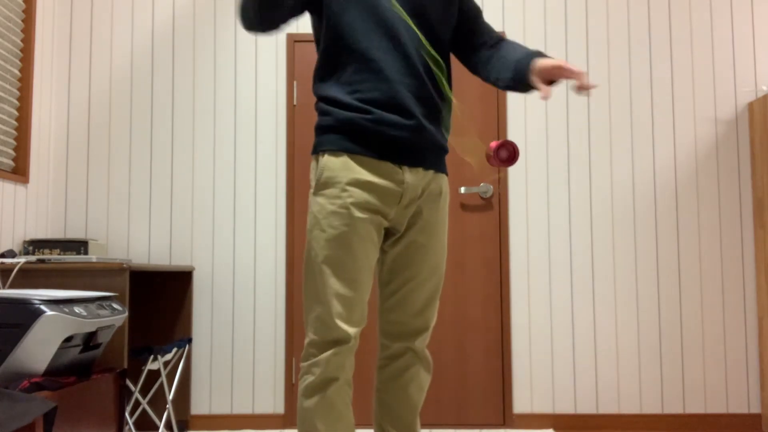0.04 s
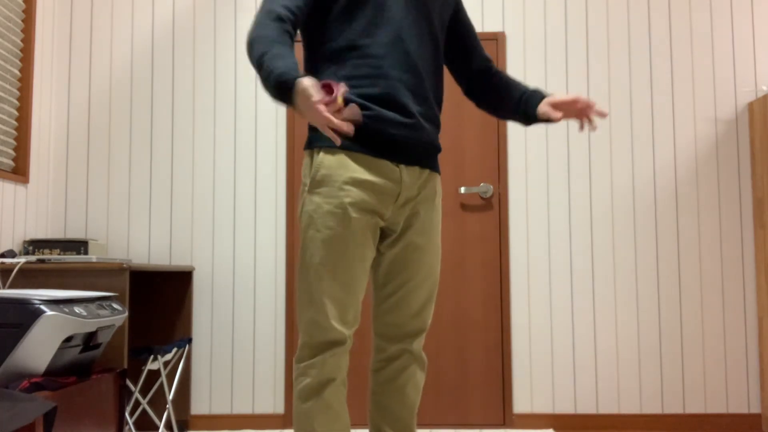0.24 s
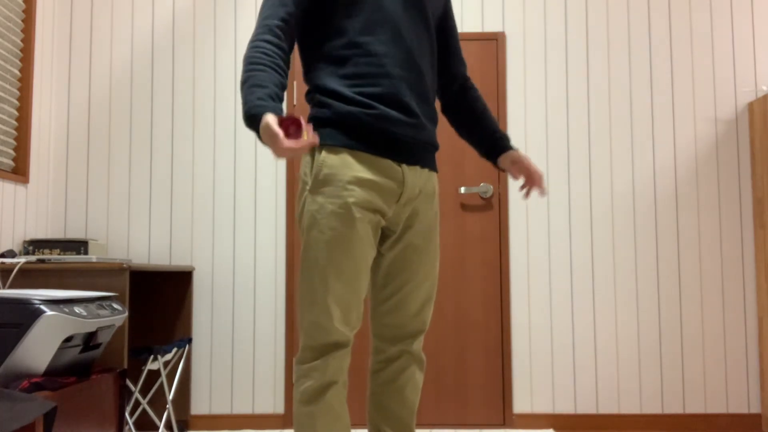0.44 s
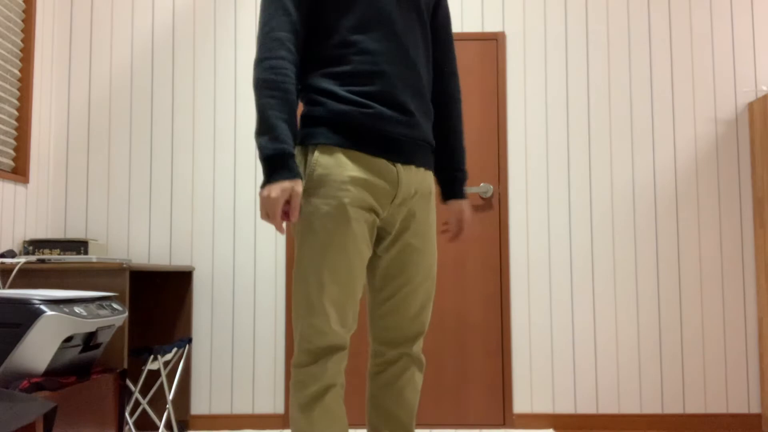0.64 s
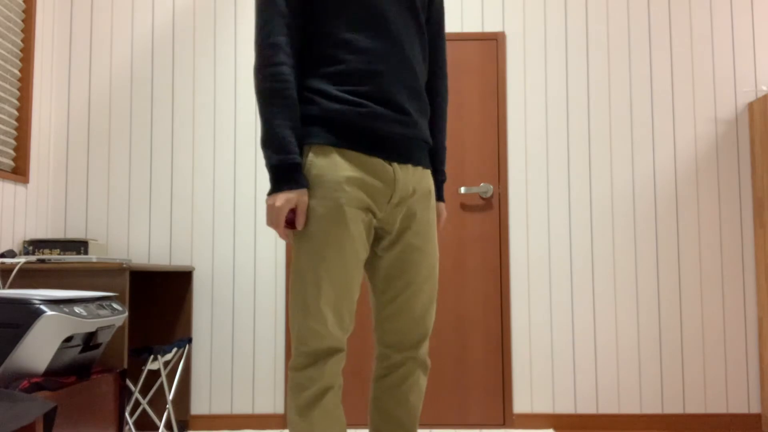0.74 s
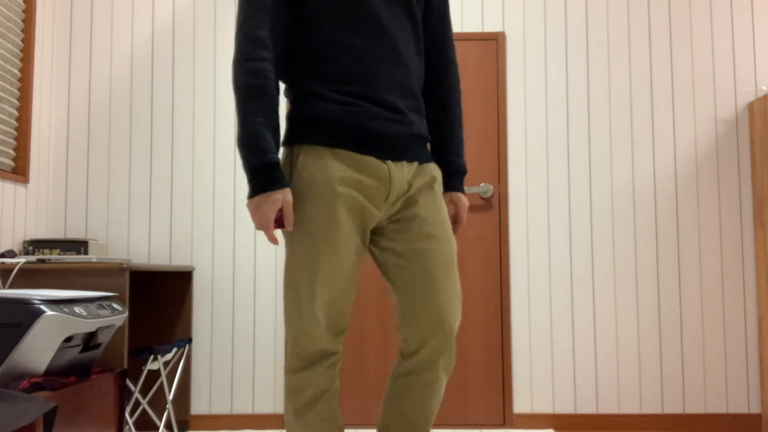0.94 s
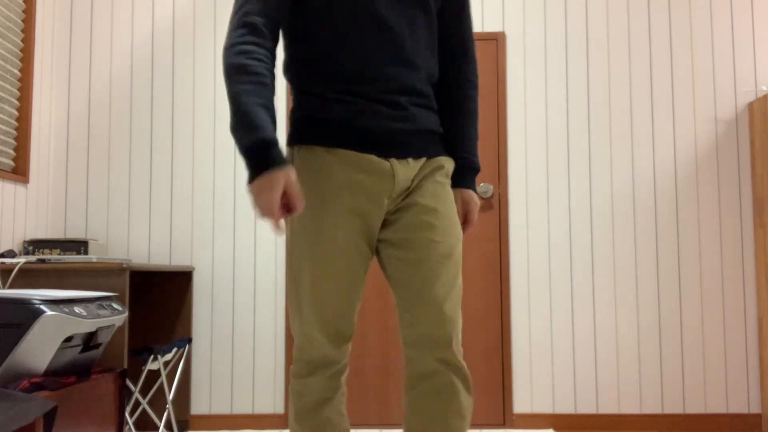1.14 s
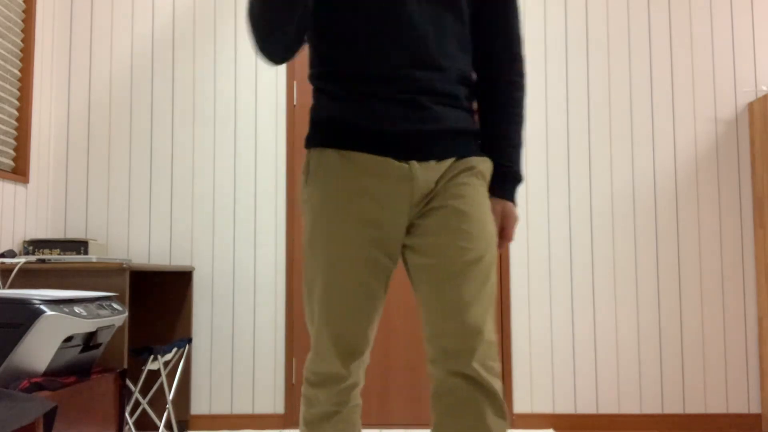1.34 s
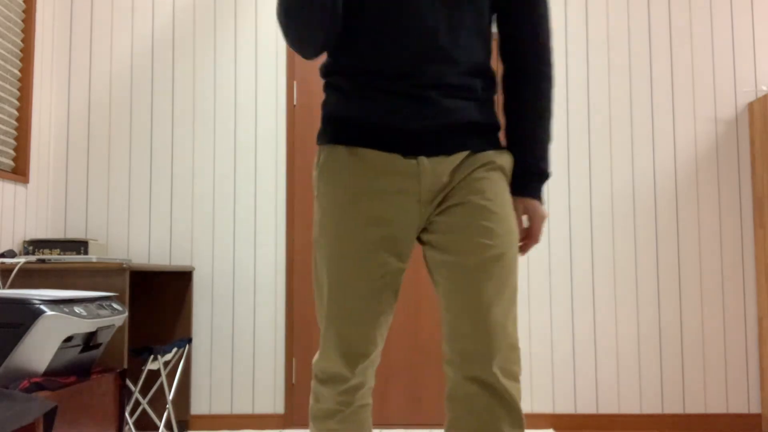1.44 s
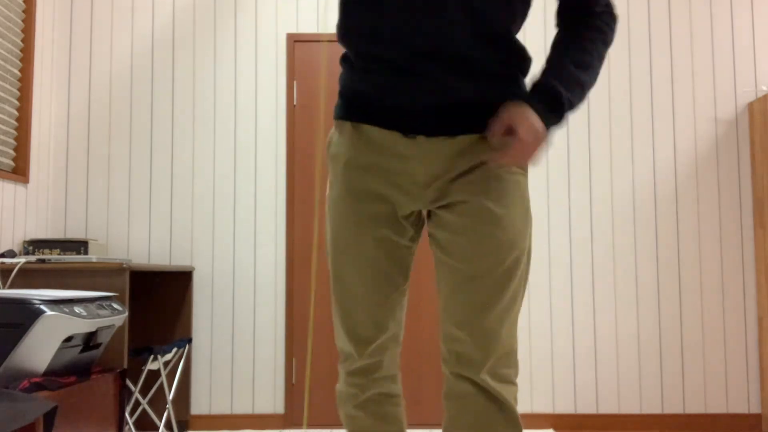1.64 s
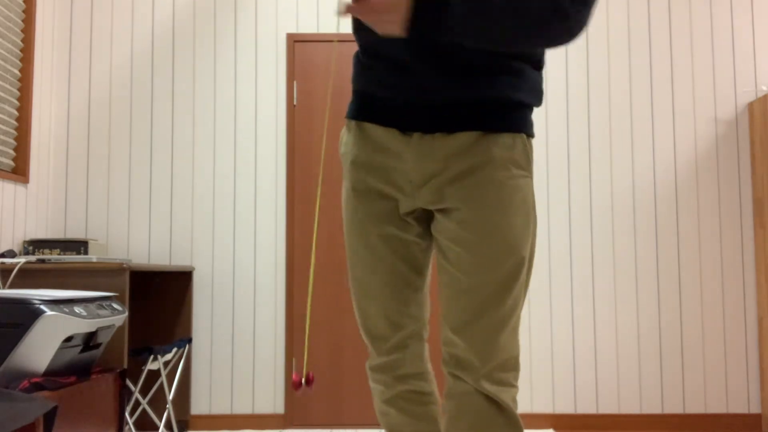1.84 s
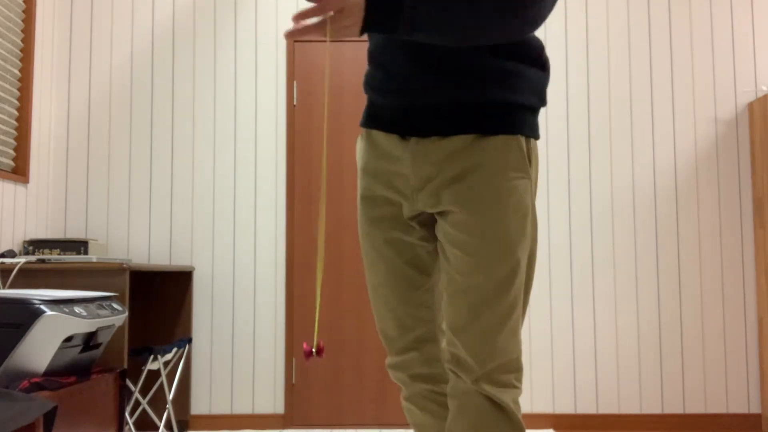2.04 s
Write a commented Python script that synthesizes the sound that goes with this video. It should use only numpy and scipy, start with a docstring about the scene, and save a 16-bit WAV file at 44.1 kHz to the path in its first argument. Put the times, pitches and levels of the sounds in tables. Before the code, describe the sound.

A metal yo-yo squeals thinly up its string and is caught at 0.2 seconds with a loud, briefly ringing knock. Soft pats, scuffs and sleeve swishes follow from about 0.7 seconds. A heel thumps on floorboards at 1.3 seconds. The string zips out around 1.5 and snaps tight just after 1.6, and the yo-yo spins with a faint hissing whir until about 2 seconds, in a small quiet room.

```python
"""In a small quiet room, a metal yo-yo squeals up its string and is caught with a ringing knock.
A hand pats the trousers, a foot shuffles, a sleeve swishes and a heel thumps as it is thrown again.
The string unwinds and snaps tight, and the yo-yo whirs on its bearing. The bearing shakes the
two metal shells, and the spin splits each of their ringing tones in two."""
import sys
import numpy as np
from scipy import signal
from scipy.fft import rfft, irfft
from scipy.io import wavfile

SR = 44100
rng = np.random.default_rng(int(sys.argv[2]) if len(sys.argv) > 2 else 0)


def dump(signal):
    """Clip the signal to [-1, 1] and save it as 16-bit WAV at the path in sys.argv[1]."""
    limited = np.clip(np.atleast_2d(signal).T, -1, 1)
    pcm = np.round(limited * 32767).astype(np.int16)
    wavfile.write(sys.argv[1], SR, pcm)


N = 92610
T = np.arange(N) / SR
EARS = np.array([[1], [-1]])  # left, right
EAR_PHASE = 0.59  # radians by which a ringing tone is ahead on the left and behind on the right


def amp(db):
    """Turn decibels into a gain."""
    return 10 ** (np.asarray(db) / 20)


def unit(x):
    """Scale a signal to an average power of 1."""
    return x / np.sqrt(np.mean(np.abs(x) ** 2))


def curve(rows, column=1):
    """Join the points of a time table with straight lines."""
    rows = np.array(rows)
    return np.interp(T, rows[:, 0], rows[:, column])


def colour(x, points, keep_power=True):
    """Shape the bass and treble of a sound along (frequency [Hz], level [dB]) points."""
    size = 2 * N
    hz, db = np.array(points).T
    gain = amp(np.interp(np.log(np.arange(N + 1) * SR / size + 1), np.log(hz), db))
    cepstrum = irfft(np.log(unit(gain) if keep_power else gain))
    # folding this in half keeps the filter from sounding before its input
    cepstrum[1:N] *= 2
    cepstrum[N + 1:] = 0
    return irfft(rfft(x, size) * np.exp(rfft(cepstrum)))[..., :N]


def wander(hz):
    """A random wobble of about size 1, mostly slower than hz."""
    freqs = np.arange(N // 2 + 1) * SR / N
    return unit(irfft(rfft(rng.standard_normal(N)) / (1 + (freqs / hz) ** 2), N))


def stereo_noise(wide_hz=450):
    """Noise that is alike at both ears in the bass and differs above it."""
    mid, side = rng.standard_normal((2, N))
    side = signal.sosfilt(signal.butter(1, wide_hz, "high", fs=SR, output="sos"), side)
    return unit(mid + EARS * side)


def fade(ring_s, age=T):
    """Die away by 60 dB in ring_s seconds."""
    return np.exp(-np.log(1000) * age / ring_s)


def room(x, echo_db, ring_s=0.31, treble_ring_s=0.2, gap_s=0.0075):
    """Add the wash of echoes from the walls, whose treble dies first."""
    wash = stereo_noise()
    low = signal.sosfilt(signal.butter(1, 4000, fs=SR, output="sos"), wash)
    tail = (low * fade(ring_s) + (wash - low) * fade(treble_ring_s)) * (T > gap_s)
    echoes = signal.fftconvolve(np.atleast_2d(x), unit(tail) / np.sqrt(N), axes=-1)[:, :N]
    return (x + amp(echo_db) * echoes) / np.hypot(1, amp(echo_db))


def burst(start, db, decay):
    """A hit: noise that starts at once and dies away."""
    return rng.standard_normal(N) * amp(db) * (T >= start) * np.exp(-np.maximum(T - start, 0) / decay)


def swells(rows):
    """Smooth rises and falls in loudness."""
    return sum(amp(db) * np.exp(-((T - at) / np.where(T < at, rise, fall)) ** 2 / 2)
               for at, rise, fall, db in rows)


def pushes(rows):
    """Soft bumps: a few cycles of a low tone each."""
    return sum(amp(db) * np.cos(2 * np.pi * hz * (T - at)) * np.exp(-((T - at) / length) ** 2 / 2)
               for at, db, hz, length in rows)


def tone(hz, phase=0):
    """A pure tone that follows a moving pitch."""
    return np.cos(2 * np.pi * (np.cumsum(hz) / SR + rng.random()) + phase)


def whir(forward_db=1.8, flutter_db=4):
    """The bearing hisses and shakes the shells; the spin splits each tone into a fluttering pair."""
    # how fast the yo-yo spins (time [s], speed [turns/s])
    spin_speed = [(0, 56), (.19, 40.5), (.22, 2.5), (1.4, 0), (1.46, 69), (1.7, 80)]
    # how hard the bearing rattles (time [s], level [dB])
    rattle_level = [(0, -65.5), (.17, -76), (.2, -61.5), (.22, -110), (1.38, -84.5), (1.5, -60),
                    (1.62, -72.5), (1.69, -65.5), (1.85, -71.5), (1.91, -83), (2.01, -70.5)]
    # tones of the shells (pitch [Hz], shift by spin [Hz per turn/s], waver [Hz], level [dB])
    shell_tones = [(2163, 1, 7, 5.5), (5160, 2.4, 10, -8), (6110, 4.7, 45, -16.5)]
    # dry hiss of the bearing (time [s], level [dB])
    hiss_level = [(0, -69), (.2, -81), (.23, -110), (1.4, -100), (1.47, -61), (1.58, -63), (1.68, -57.5),
                  (1.79, -66), (1.89, -56), (1.94, -61.5), (2.03, -62.5)]
    # colour of the hiss (frequency [Hz], level [dB])
    hiss_colour = [(1200, -27), (2600, -2.5), (4200, -10), (7000, 0), (9700, 4.5), (11500, -10),
                   (14500, -3), (16000, -13.5)]
    spin, ring = curve(spin_speed), 0
    for hz, shift, waver, db in shell_tones:
        for way in (-1, 1):  # the wave running with the spin is the higher and louder one
            phase = EARS * (EAR_PHASE + 0.5 * wander(39))
            pitch = hz + way * shift * spin + waver * wander(39)
            ring = ring + tone(pitch, phase) * amp(db + way * forward_db + flutter_db * wander(24))
    once_a_turn = 1 + 0.32 * tone(spin)
    hiss = colour(stereo_noise(), hiss_colour) * amp(curve(hiss_level) + wander(26)) * once_a_turn
    return room(ring * amp(curve(rattle_level)), -8.5) + room(hiss, -0.46)


def squeal(flare_rise_s=0.019, flare_fall_s=0.024, flutter_db=3.3):
    """The string grips the yo-yo's pads and makes the shells sing; in free spin it only brushes them."""
    # squeal on the way up (time [s], low tones [dB], middle tone [dB], high tones [dB])
    grip_levels = [(0, -51.5, -60, -48), (.022, -55.5, -63.5, -56.5), (.05, -49.5, -57, -58),
                   (.096, -62.5, -69, -63), (.122, -50.5, -81, -75), (.17, -78, -87, -85.5),
                   (.197, -51.5, -81, -104), (.25, -120, -120, -120)]
    # brief brushes on the pads (time [s], low tones [dB], middle tone [dB], high tones [dB])
    flares = [(1.428, -71, -71, -67.5), (1.57, -67, -67, -98), (1.73, -74, -67, -94),
              (1.845, -75, -88, -105), (1.925, -70.5, -75.5, -100)]
    # low, middle and high squeal tones (pitch [Hz], level [dB], waver [Hz])
    low = [(5362, 0, 10), (5160, -5, 28)]
    middle = [(6379, 0, 9)]
    high = [(13382, 0, 12), (13775, -8, 40)]
    sound = 0
    for k, tones in enumerate((low, middle, high)):
        brushes = swells([(at, flare_rise_s, flare_fall_s, dbs[k]) for at, *dbs in flares])
        rub = curve(grip_levels, column=k + 1)
        for hz, db, waver in tones:
            singing = np.sqrt(2) * tone(hz + waver * wander(17), EARS * EAR_PHASE)
            sound = sound + singing * (amp(rub) + brushes) * amp(db + flutter_db * wander(60))
    return room(sound, -7.5)


def string(zip_width_hz=3000, zip_edge_db=-9):
    """Twisted thread rasps on and off the axle in tiny catches, zips out and snaps tight."""
    # string running on the axle (time [s], level [dB])
    rasp_level = [(0, -63.5), (.04, -65), (.09, -50.5), (.13, -89), (.18, -61), (.21, -100), (1.415, -100),
                  (1.452, -44), (1.49, -64), (1.535, -59), (1.58, -56), (1.66, -97)]
    # colour of the rasp (frequency [Hz], level [dB])
    rasp_colour = [(50, -20.5), (150, 8.5), (420, 5.5), (1500, 0.5), (2600, -4), (5000, -11), (16000, -24)]
    # string leaving the groove (time [s], rise [s], fall [s], level [dB], strongest frequency [Hz])
    zip_events = [(1.48, 0.028, 0.0087, -49.5, 10800), (1.645, 0.009, 0.02, -51, 13600)]
    # colour of a zip below its peak (frequency [Hz], level [dB])
    zip_colour = [(1000, -19), (3000, -5), (7000, -9)]
    # colour of the snap (frequency [Hz], level [dB])
    snap_colour = [(60, 3.5), (380, 0), (1500, -2.5), (2700, -5.5), (3300, -21), (8000, -26)]
    catches = rng.standard_normal(N) * amp(3.2 * wander(250))
    rasp = colour(catches, rasp_colour) * amp(curve(rasp_level))
    zips = 0
    for *swell, hz in zip_events:
        peak = [(hz - zip_width_hz, zip_edge_db), (hz, 0), (hz + zip_width_hz, zip_edge_db)]
        hiss = colour(stereo_noise(), zip_colour + peak)
        zips = zips + hiss * swells([swell]) * amp(3.83 * wander(240))
    running = room(rasp, 3.8) + room(zips, -1.4)
    snap = colour(burst(start=1.635, db=-38, decay=0.0085), snap_colour)
    return running + room(snap, 2.6)


def weight_shift():
    """The player's shifting weight makes a low rumble."""
    # loudness of the rumble (time [s], level [dB])
    rumble_level = [(0, -69.5), (.25, -64), (.4, -76), (.95, -65.5), (1.25, -69), (1.3, -43.5), (1.43, -49),
                    (1.55, -59), (1.68, -60.5), (1.76, -71)]
    # its colour (frequency [Hz], level [dB])
    rumble_colour = [(25, -22), (65, -1.5), (95, -3.5), (130, -13), (220, -21), (1500, -57.5)]
    return colour(stereo_noise(), rumble_colour) * amp(curve(rumble_level))


def still_air(level_db=-73):
    """The faint, steady hush of the room."""
    # colour of the hush (frequency [Hz], level [dB])
    air_colour = [(20, -4.5), (70, -10), (150, -9.5), (260, 2.5), (400, -11), (800, -15.5), (1600, -7.5),
                  (4000, -25), (13000, -24.5), (16000, -47.5)]
    return colour(stereo_noise(), air_colour) * amp(level_db)


def hand_thumps():
    """The yo-yo tugs the finger or meets the palm with a dull thump."""
    # thumps (time [s], level [dB], pitch [Hz], length [s])
    thumps = [(.091, -52, 209.4, 0.0018), (.102, -50.5, 370, 0.0013), (.2065, -37.5, 444, .0016),
              (.216, -44, 257, 0.0015), (1.645, -39.5, 367, 0.0015)]
    return room(pushes(thumps), -1.5)


def catch(attack_s=0.0025, grip_s=0.0165, grip_fade_s=0.0015, grip_db=-7):
    """Each knock in the hand thuds and rings the shells; the closing fingers turn the ring down."""
    # knocks (time [s], thud level [dB], thud decay [s], ring level [dB])
    knocks = [(0.2024, -43, 0.0052, -47), (0.2095, -33.5, 0.0075, -21.5)]
    # colour of the thud (frequency [Hz], level [dB])
    thud_colour = [(40, -15.5), (150, -6), (400, -0.5), (700, -2), (1500, 3), (2500, -1.5), (3500, -8),
                   (4600, -11.5), (13500, -23), (16000, -32.5)]
    # tones of the struck shells (pitch [Hz], level [dB], ring time [s])
    shell_tones = [(2143, -2, 0.38), (2173, -8, 0.38), (2060, -13, 0.33), (5170, -23, 0.24)]
    thud, ring = 0, 0
    for start, thud_db, decay, ring_db in knocks:
        age = np.maximum(T - start, 0)
        grip = amp(grip_db * (1 + np.tanh((age - grip_s) / grip_fade_s)) / 2)
        tones = sum(amp(db) * np.sin(2 * np.pi * hz * age + EARS * EAR_PHASE) * fade(ring_s, age)
                    for hz, db, ring_s in shell_tones)
        ring = ring + amp(ring_db) * tones * grip * (1 - np.exp(-age / attack_s))
        thud = thud + burst(start, thud_db, decay)
    return room(colour(thud, thud_colour), 2.8) + room(ring, -11)


def pats_and_scuffs():
    """Soft pats and scuffs: a hand lands on the trousers and a foot shuffles."""
    # soft touches (time [s], level [dB], decay [s])
    touches = [(0.668, -50, 0.0016), (0.6733, -46.5, 0.026), (0.858, -48.5, 0.0072), (.922, -48.5, 0.0038)]
    # their colour (frequency [Hz], level [dB])
    touch_colour = [(40, -29), (150, -4), (600, -0.5), (1100, -7.5), (1500, -15), (3500, -26), (5000, -36),
                    (14000, -54)]
    return room(colour(sum(burst(*touch) for touch in touches), touch_colour), 3.1)


def sleeves():
    """Moving cloth swishes in soft swells of noise."""
    # swishes (time [s], rise [s], fall [s], level [dB])
    swishes = [(.885, 0.027, 0.088, -69), (1.165, 0.035, 0.062, -62), (1.3, 0.058, 0.36, -64.5)]
    # their colour (frequency [Hz], level [dB])
    cloth_colour = [(100, -5), (300, -4.5), (650, -11), (1400, -4), (3300, -8.5), (5500, -17), (8000, -26),
                    (15000, -37)]
    return colour(stereo_noise(), cloth_colour) * swells(swishes) * amp(0.72 * wander(90))


def footstep(rise_s=0.0094):
    """Heel and sole thud down and set the floorboards booming."""
    # thuds of the foot (time [s], level [dB], pitch [Hz], length [s])
    thuds = [(1.298, -37, 170, .004), (1.32, -29, 76, .012)]
    # tones of the floor (pitch [Hz], level [dB], ring time [s])
    floor_tones = [(60, -14, .35), (81, -12, .3), (144, 1, .25)]
    foot = pushes(thuds)
    boards = sum(amp(db) * np.sin(2 * np.pi * hz * T) * fade(ring_s) for hz, db, ring_s in floor_tones)
    boom = signal.fftconvolve(foot, boards * (1 - np.exp(-T / rise_s)))[:N] / (SR * rise_s)
    return foot + boom


def scene():
    """The yo-yo and its player over the still air of the room."""
    return (whir() + squeal() + string() + weight_shift() + still_air()
            + hand_thumps() + catch() + pats_and_scuffs() + sleeves() + footstep())


def record(dry, top_hz=15400):
    """A close pair of microphones cancels parts of the treble; the very top is cut off."""
    # response to what left and right share (frequency [Hz], gain [dB])
    mid_response = [(6900, 0), (7900, -19.5), (8700, -41.5), (9500, -5.5), (11000, 0)]
    # response to what differs between them (frequency [Hz], gain [dB])
    side_response = [(6000, 1.5), (8500, 1), (10300, 0), (11600, -19), (12700, -13), (13800, -0.5)]
    mid = colour((dry[0] + dry[1]) / 2, mid_response, keep_power=False)
    side = colour((dry[0] - dry[1]) / 2, side_response, keep_power=False)
    return signal.sosfilt(signal.ellip(8, .2, 70, top_hz, fs=SR, output="sos"), mid + EARS * side)


dry = scene()
out = record(dry)
dump(out)
```